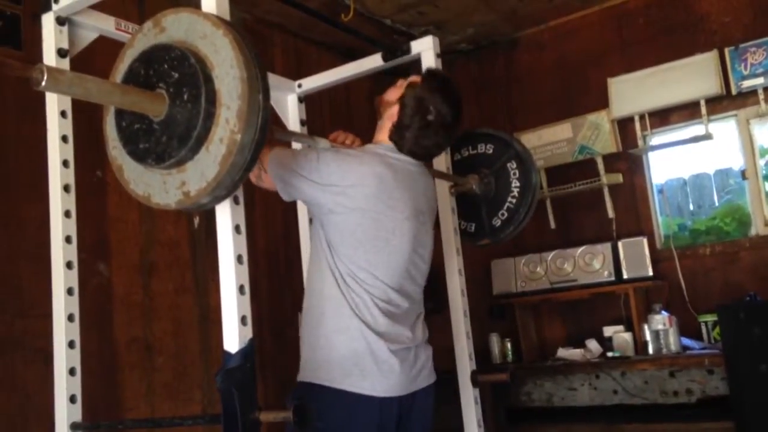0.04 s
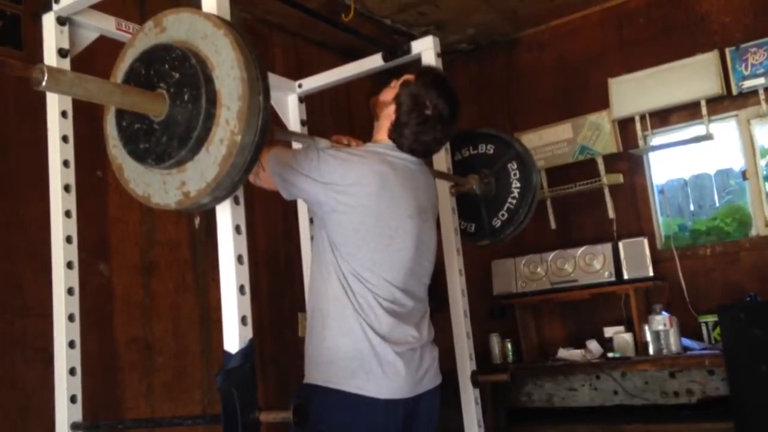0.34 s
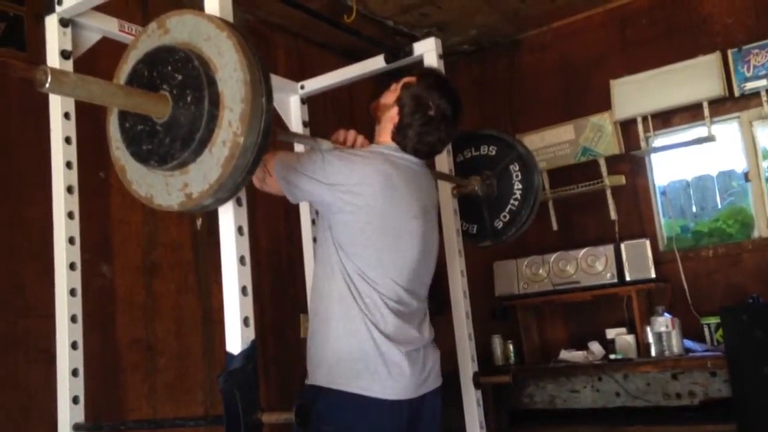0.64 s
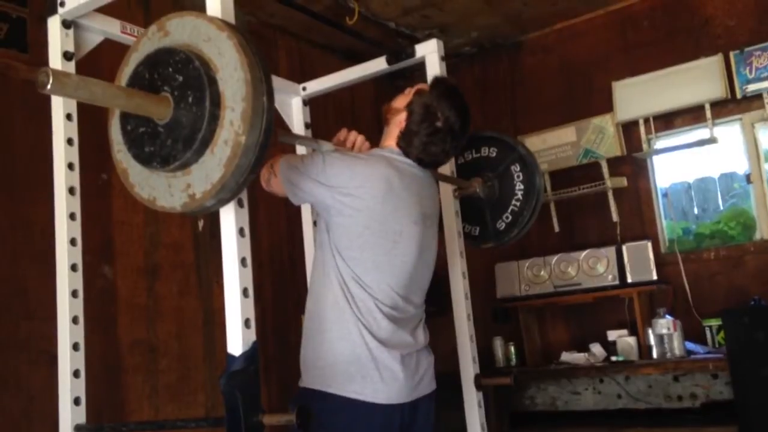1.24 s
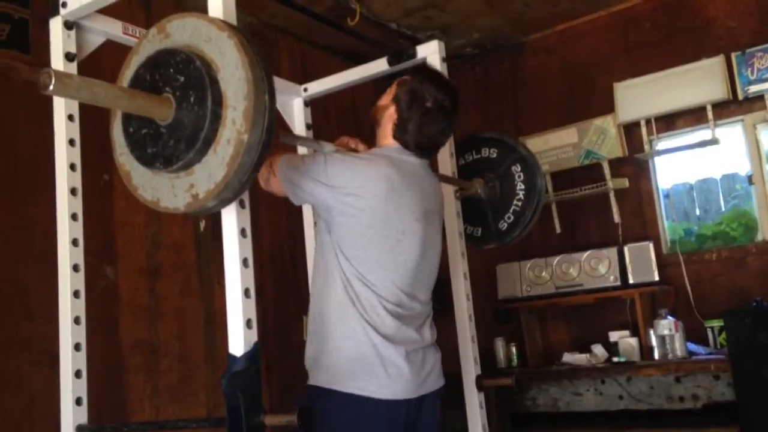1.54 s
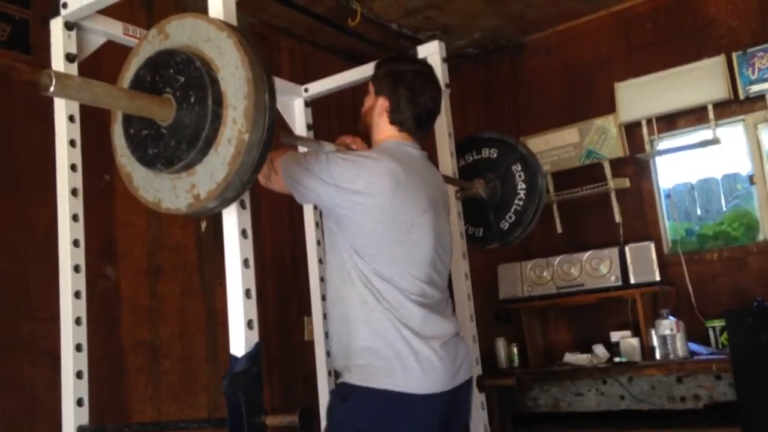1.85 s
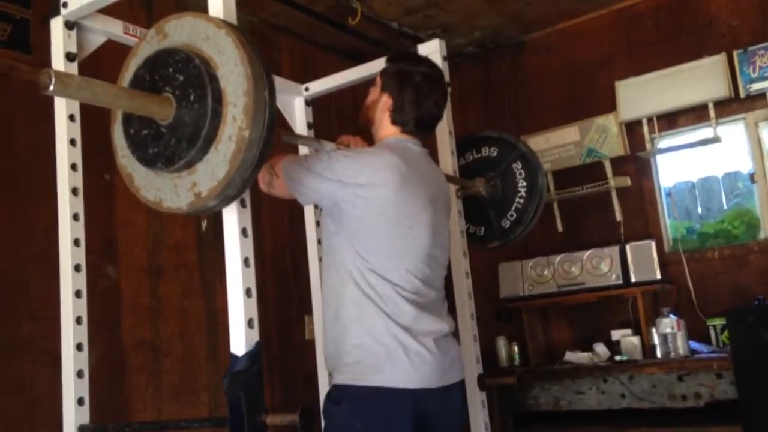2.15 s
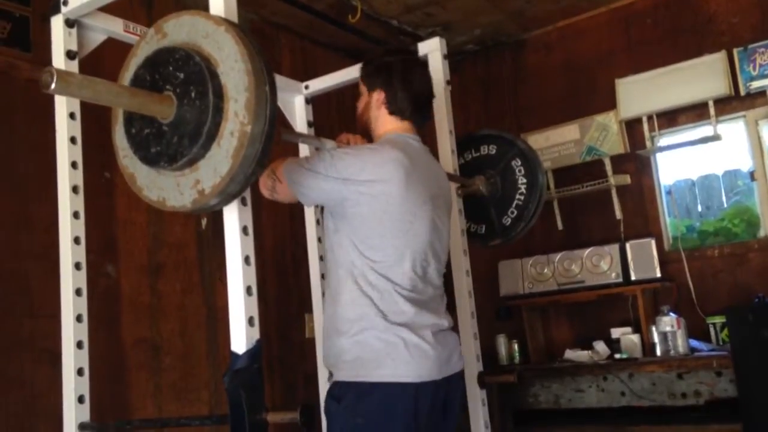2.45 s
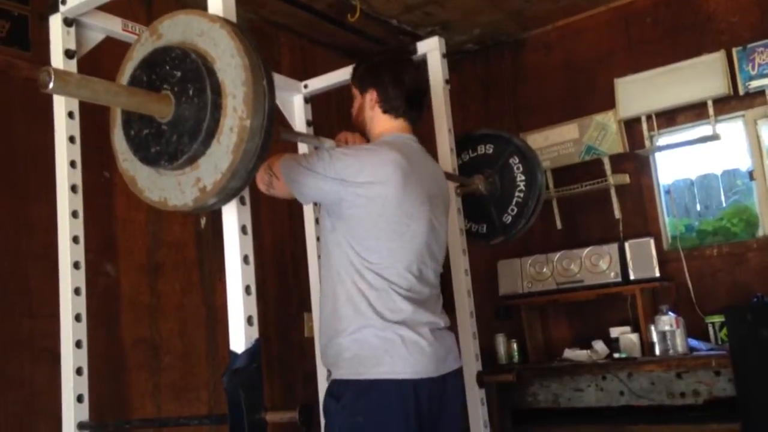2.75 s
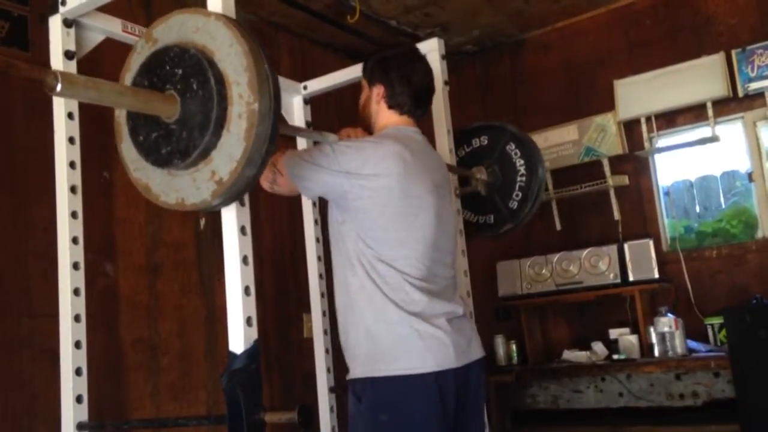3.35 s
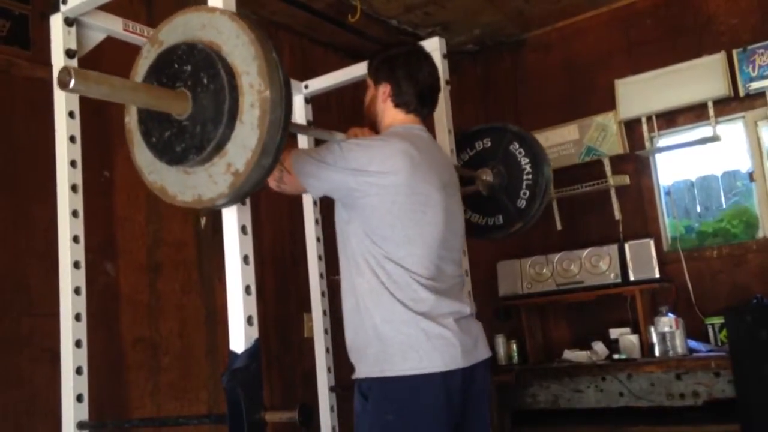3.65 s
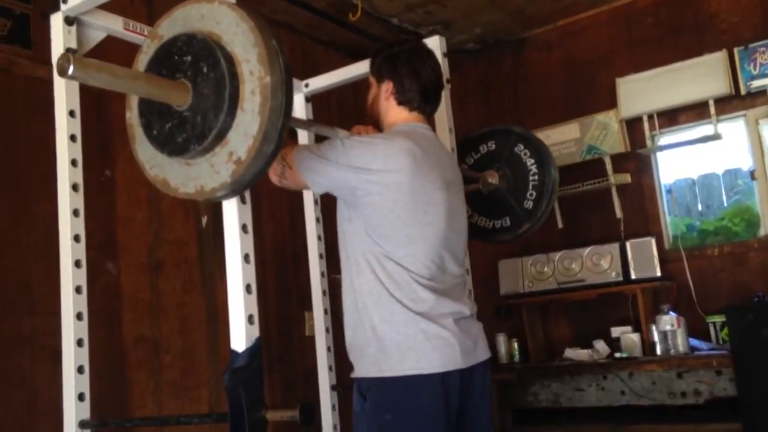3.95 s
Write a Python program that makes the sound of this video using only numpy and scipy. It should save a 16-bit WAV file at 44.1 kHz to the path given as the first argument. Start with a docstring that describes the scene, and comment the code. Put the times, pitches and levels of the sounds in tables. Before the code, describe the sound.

A loaded barbell is racked in a quiet garage. Over low rumble and faint hiss, the plates creak faintly around 0.7 and 1.4 seconds. Shoes scuff and step softly at 2 seconds, then a light clink at 2.35 and a dull rustle. At 3.5 seconds the bar crashes and thuds loudly into the hollow steel rack; at 3.8 the iron plates clank again and ring.

```python
"""A quiet wooden garage gym, heard from one fixed microphone. A lifter shuffles forward with a loaded
barbell, whose plates creak faintly on their sleeves and clink once as the bar sways. The bar runs into
the steel rack: the hollow frame crashes and thuds, then the far end lands and the iron plates clank
and ring. A low rumble, a faint hiss, a fading hum and the lifter's dull rustle lie underneath."""
import sys
import numpy as np
from scipy import signal
from scipy.fft import rfft, irfft, next_fast_len
from scipy.io import wavfile
from scipy.ndimage import map_coordinates

SR = 44100
rng = np.random.default_rng(int(sys.argv[2]) if len(sys.argv) > 2 else 0)


def put_to_file(sound):
    """Save the sound as 16-bit audio at rate SR, in the file named by the first command-line argument."""
    columns = np.atleast_2d(sound).T  # one column per channel
    safe = np.clip(columns, -1, 1)
    whole_steps = np.round(safe * 32767)
    wavfile.write(sys.argv[1], SR, whole_steps.astype(np.int16))


N = 176400

BUILD_S, RING_BUILD_S = 0.0013, 0.0012  # reflections fill in after a blow
KNEE_HZ = 2000  # softer blows lose treble above this
# How the room dies away. Each row: frequency in Hz, seconds to fall 60 dB.
ROOM_DECAY = [(100, .2), (1000, 0.62), (8000, 0.3)]


def amp(db):
    """Decibels to gain."""
    return 10 ** (np.asarray(db) / 20)


def unit(x):
    """Scale to rms 1."""
    return x / np.sqrt(np.mean(x ** 2) + 1e-20)


def along(points, hz):
    """Read a curve of (Hz, value) points on a log frequency axis."""
    freqs, values = np.transpose(points)
    return np.interp(np.log(hz + 1), np.log(freqs + 1), values)


def wobble(rate):
    """A smooth random curve, rate knots a second."""
    return map_coordinates(rng.standard_normal(N // 40), [np.arange(N) * rate / SR], mode="wrap")


def bell_curve(peak_s, width_s):
    """A smooth rise and fall; the width is one standard deviation."""
    return np.exp(-.5 * ((np.arange(N) / SR - peak_s) / width_s) ** 2)


def noise(colour, size):
    """Noise of rms 1, coloured by (Hz, dB) points."""
    gain = amp(along(colour, np.fft.rfftfreq(size, 1 / SR)))
    return unit(irfft(rfft(rng.standard_normal(size)) * gain, size))


def add(track, s, sound):
    """Mix a sound into the track at s seconds."""
    part = track[round(s * SR):][:len(sound)]
    part += sound[:len(part)]


def rough_note(hz, rate):
    """A note whose level and phase wander, rate times a second."""
    phase = 2 * np.pi * hz * np.arange(N) / SR
    return wobble(rate) * np.sin(phase) + wobble(rate) * np.cos(phase)


def knock(hz, t60):
    """A single damped resonance, 60 dB down after t60 seconds."""
    t = np.arange(SR // 2) / SR
    return np.sqrt(2) * np.sin(2 * np.pi * hz * t) * amp(-60 * t / t60) * (1 - np.exp(-t / BUILD_S))


def thumps(rows, cycles, tail_db, tail_t60):
    """Dull knocks that fall 60 dB in the given cycles, each with a diffuse tail around its pitch."""
    out = np.zeros(N)
    for s, db, hz in rows:
        tail = noise([(hz / 3, -30), (hz, 0), (hz * 8, -70)], SR // 2)
        tail *= np.abs(signal.hilbert(knock(hz, tail_t60)))
        add(out, s, amp(db) * (knock(hz, cycles / hz) + amp(tail_db) * tail))
    return out


def burst(colour, decay):
    """One blow into countless overlapping modes, each band dying at its own speed."""
    hz, t, bands = signal.stft(noise(colour, SR), SR, nperseg=512)
    fade = amp(-60 * t / along(decay, hz)[:, None])
    tail = signal.istft(bands * fade, SR, nperseg=512)[1][:SR]
    return tail * (1 - np.exp(-np.arange(SR) / SR / BUILD_S))


def clatter(hits, colour, decay, crack_db, crack_s, ripple_db=0):
    """A burst for each blow, led by a short crack; soft blows are duller and swell more slowly."""
    dulling, swell_s_per_db = 0.33, .00015  # dulling: dB lost per octave for each dB softer
    size = N + SR
    out = np.zeros(size)
    crack = 1 + amp(crack_db) * np.exp(-np.arange(SR) / SR / crack_s)
    hardest = max(db for _, db in hits)
    for s, db in hits:
        softer_db = hardest - db
        dulled = [(hz, level - dulling * softer_db * max(0, np.log2(hz / KNEE_HZ)))
                  for hz, level in colour]
        swell = 1 - np.exp(-np.arange(SR) / (1 + SR * swell_s_per_db * softer_db))
        add(out, s, amp(db) * crack * swell * burst(dulled, decay))
    # All blows share the body's fine spectral peaks and dips.
    lag = np.arange(size) / SR
    echoes = rng.standard_normal(size) * (lag > .002) * (lag < .02)
    treble = np.clip(np.fft.rfftfreq(size, 1 / SR) / 3000, 0, 1)
    depth = ripple_db * np.log(10) / 20 * np.sqrt(2) * treble
    body = np.exp(depth * rfft(echoes / np.linalg.norm(echoes)) - depth ** 2 / 2)
    return irfft(rfft(out) * body, size)[:N]


def ring(hits, modes, rough, rattle_rate):
    """Blows add energy to each mode, soft ones less to high modes; rattling contact roughens the note."""
    dulling = .9  # dB lost per octave for each dB softer
    t, out = np.arange(N) / SR, np.zeros(N)
    age = t[:SR]
    hardest = max(db for _, db in hits)
    for hz, level, t60 in modes:
        energy = np.zeros(N)
        fade = (amp(-60 * age / t60) * (1 - np.exp(-age / RING_BUILD_S))) ** 2
        octaves = max(0, np.log2(hz / KNEE_HZ))
        for s, db in hits:
            add(energy, s, amp(db + level - dulling * octaves * (hardest - db)) ** 2 * fade)
        phase = 2 * np.pi * (hz * t + rng.random())
        note = (1 + rough * wobble(rattle_rate)) * np.sin(phase)
        phase_jitter = rough * wobble(rattle_rate) * np.cos(phase)
        out += np.sqrt(2 * energy) * (note + phase_jitter)
    return out


def room_tone():
    """A wavering, slowly easing low rumble and an even hiss."""
    # Their spectra. Each row: frequency in Hz, relative level in dB.
    rumble_colour = [(20, -64), (32, -16), (45, -3), (62, -5.5), (80, 1.5), (115, 0.5), (170, -5),
                     (250, -14.5), (400, -24.5), (4000, -89)]
    hiss_colour = [(100, 3.5), (400, -1), (850, 0.5), (1500, -2.5), (3000, -7.5), (6000, -11), (10000, -14),
                   (15000, -14.5)]
    t, fall_db_per_s = np.arange(N) / SR, .5
    rumble = noise(rumble_colour, N) * amp(-55 - fall_db_per_s * (t - t.mean()) + 2.4 * wobble(8))
    return rumble + amp(-63) * noise(hiss_colour, N)


def hum():
    """A low, wavering hum dies away."""
    start_db, fade_db_per_s = -58.5, 24
    return amp(start_db - fade_db_per_s * np.arange(N) / SR) * rough_note(hz=172, rate=35)


def creaks():
    """The plates rub on their sleeves: each slip swells into a faint, rough note."""
    # Each row: peak time in seconds, level in dB, pitch in Hz, width in seconds.
    slips = [(.715, -69, 1400, .06), (1.412, -66, 2320, .018), (1.49, -72, 2230, .04)]
    return sum(amp(db) * bell_curve(s, width) * rough_note(hz, rate=160) for s, db, hz, width in slips)


def feet():
    """Shoes scuff the floor, heard direct and off the walls, among soft footfalls."""
    # Scuffs. Each row: peak time in seconds, relative level in dB, width in seconds.
    scuffs = [(2.001, -52.5, 0.011), (2.069, -53, 0.013), (2.114, -59, 0.062)]
    # The grit's spectrum. Each row: frequency in Hz, relative level in dB.
    grit_colour = [(200, -13), (600, 8), (1100, -3), (2200, -0.5), (3800, 3), (7000, -6), (12000, -18),
                   (16000, -45)]
    # Footfalls. Each row: start in seconds, level in dB, pitch in Hz.
    steps = [(2.038, -52, 618), (2.136, -47, 320), (2.237, -52, 114)]
    strokes = sum(amp(db) * bell_curve(s, width) for s, db, width in scuffs)
    grit = strokes * unit(noise(grit_colour, N) * amp(3 * wobble(400)))
    room = burst([(100, 0), (10000, 0)], ROOM_DECAY)
    echo = signal.fftconvolve(grit, room / np.linalg.norm(room))[:N]
    return 0.66 * grit + .5 * echo + thumps(steps, cycles=12, tail_db=-4, tail_t60=0.14)


def rustle():
    """A dull rustle swells and fades as the lifter moves."""
    # Its spectrum. Each row: frequency in Hz, relative level in dB.
    colour = [(150, -5), (260, 6), (420, -5.5), (600, -1.5), (850, -0.5), (1200, -26), (3000, -28.5)]
    return amp(-63) * bell_curve(peak_s=2.685, width_s=0.62) * noise(colour, N)


def clink():
    """Loose plates shift as the bar sways: two close ticks, each a snap and a brief note."""
    # Each row: start in seconds, note level in dB, pitch in Hz, snap level in dB.
    ticks = [(2.348, -54, 2060, -50.5), (2.357, -52.5, 1990, -61)]
    # The snap's spectrum. Each row: frequency in Hz, relative level in dB.
    snap_colour = [(200, 5.5), (700, 2), (1400, -5), (2200, 5.5), (3100, -2), (5000, 4.5), (8000, -5),
                   (14000, -21)]
    snaps = [(s, snap_db) for s, _, _, snap_db in ticks]
    out = clatter(snaps, snap_colour, ROOM_DECAY, crack_db=3.5, crack_s=0.0032)
    for s, db, hz, _ in ticks:
        flutter = 1 + .7 * wobble(115)[:SR // 2]
        add(out, s, amp(db) * knock(hz, t60=0.2) * flutter)
    return out


def rack():
    """The hollow steel frame crashes, thuds and rings; its hook pings as the bar slides in."""
    # The bar meets frame and hook. Each row: start in seconds, relative level in dB.
    hits = [(3.524, -31), (3.532, -23), (3.545, -19.5), (3.556, -22.5), (3.589, -33), (3.638, -30),
            (3.792, -30)]
    hook_touches = [(3.533, -29.5), (3.548, -29), (3.586, -31)]
    # Their resonances. Each row: frequency in Hz, relative level in dB, seconds to fall 60 dB.
    modes = [(210, -12, .55), (297, -15, 1.3), (872, -12, .45), (1165, -14, .6), (1321, -8, .2),
             (1753, -9.5, .4), (2001, -6, .42), (2293, -9, .4), (2583, -7, .3)]
    hook_modes = [(1362, 0, .23), (9430, -14, .045)]
    # The frame's dense modes. Each row: frequency in Hz, relative level in dB.
    colour = [(60, -29), (220, -2.5), (600, -3.5), (900, -1), (1050, -4), (1350, 5), (1650, 2), (2400, 1.5),
              (3300, 1), (4700, -1), (6000, -9), (8500, -17), (11500, -34), (15000, -37)]
    # Their decay in the room. Each row: frequency in Hz, seconds to fall 60 dB.
    decay = [(250, 1.05), (1000, 0.66), (2500, 0.54), (5000, 0.4), (10000, 0.38)]
    # Weight drops into the frame. Each row: start in seconds, level in dB, pitch in Hz.
    drops = [(3.552, -28, 192.6), (3.554, -19.5, 570), (3.61, -37, 82.3), (3.735, -34, 288),
             (3.982, -37.5, 254)]
    crash = clatter(hits, colour, decay, crack_db=-6, crack_s=0.004, ripple_db=3.0)
    thud = thumps(drops, cycles=19.4, tail_db=-14, tail_t60=0.24)
    ping = ring(hook_touches, hook_modes, rough=0.28, rattle_rate=60)
    ringing = ring(hits, modes, rough=0.28, rattle_rate=45)
    return amp(-3.5) * crash + thud + ping + amp(-8.5) * ringing


def plates():
    """The iron plates knock together on the sleeves, clank and ring on with the bar."""
    # Knocks. Each row: start in seconds, relative level in dB.
    hits = [(3.561, -26), (3.633, -26.5), (3.715, -39), (3.745, -41), (3.778, -31), (3.789, -23.5),
            (3.794, -19.5), (3.801, -20), (3.816, -22.5), (3.874, -41), (3.982, -36)]
    # The iron's resonances. Each row: frequency in Hz, relative level in dB, seconds to fall 60 dB.
    modes = [(1754, -11, .66), (1825, -2, .52), (1887, -12, .5), (1959, -11, .42), (1999, -8, .38),
             (2054, -9, .4), (2126, -9, .45), (2167, -11, .52), (2316, -10, .5), (2648, -11, .36),
             (3215, -7.5, .44), (3376, -6, .18), (3423, -7, .18)]
    # Its dense modes. Each row: frequency in Hz, relative level in dB.
    colour = [(200, -23.5), (700, -19), (1600, -10.5), (1850, -1.5), (2300, 5), (2900, -6.5), (3350, 3.5),
              (3800, -3), (4900, -4), (5900, -16), (8000, -16), (11500, -37), (15000, -43)]
    # Their decay in the room. Each row: frequency in Hz, seconds to fall 60 dB.
    decay = [(300, 1), (2000, 0.47), (3500, 0.35), (6000, 0.31), (10000, 0.26)]
    clank = clatter(hits, colour, decay, crack_db=4.5, crack_s=0.0039, ripple_db=2.0)
    ringing = ring(hits, modes, rough=0.81, rattle_rate=45)
    return amp(-5.5) * clank + amp(-8) * ringing


def scene():
    """The whole garage at one microphone."""
    return (rack() + plates() + clink() + creaks() + feet() + rustle() + hum() + room_tone())[None]


def record(dry):
    """The recorder cuts the deepest bass and keeps nothing above its band limit."""
    low_cut_hz, top_hz = 31, 15350
    size = next_fast_len(N + SR // 2)
    low_cut = signal.butter(N=6, Wn=low_cut_hz, btype="high", fs=SR, output="sos")
    spectrum = rfft(signal.sosfilt(low_cut, dry), size)
    return irfft(spectrum * (np.fft.rfftfreq(size, 1 / SR) < top_hz), size)[:, :N]


dry = scene()
out = record(dry)
put_to_file(out)
```